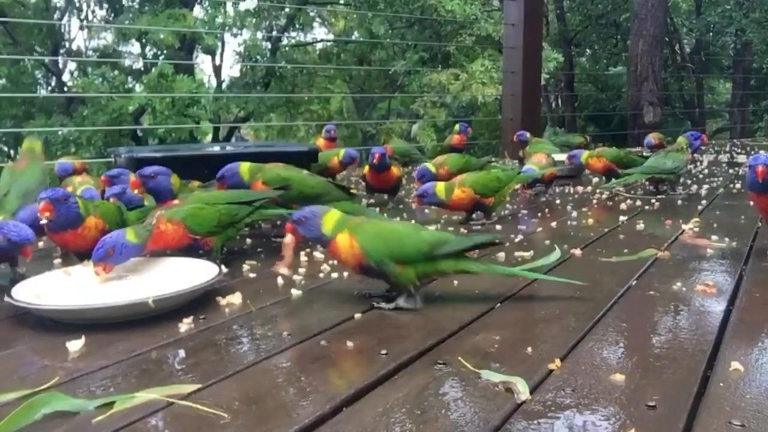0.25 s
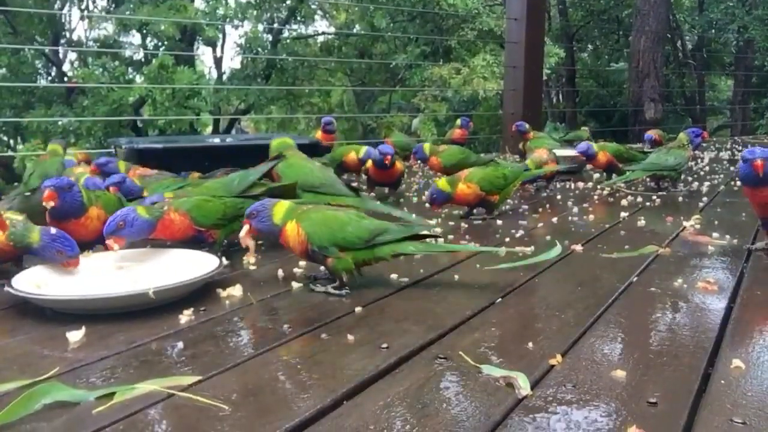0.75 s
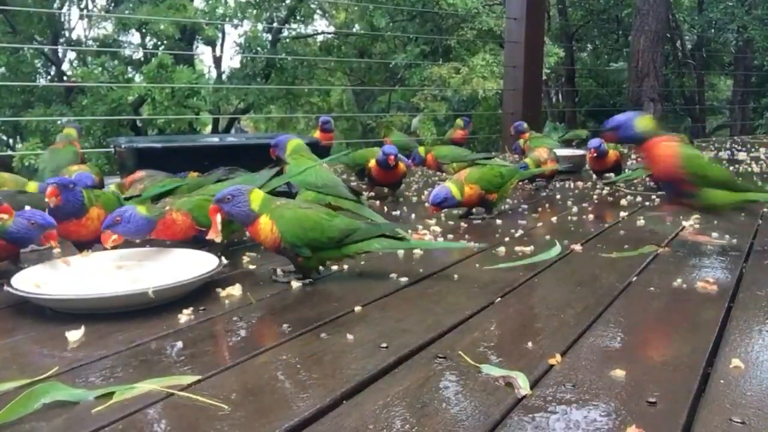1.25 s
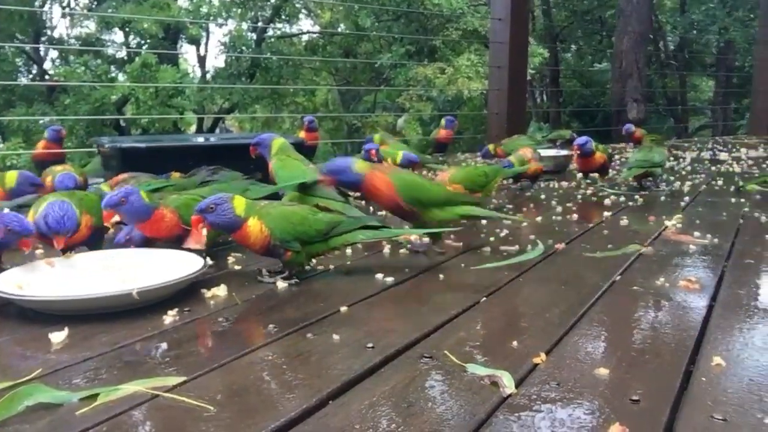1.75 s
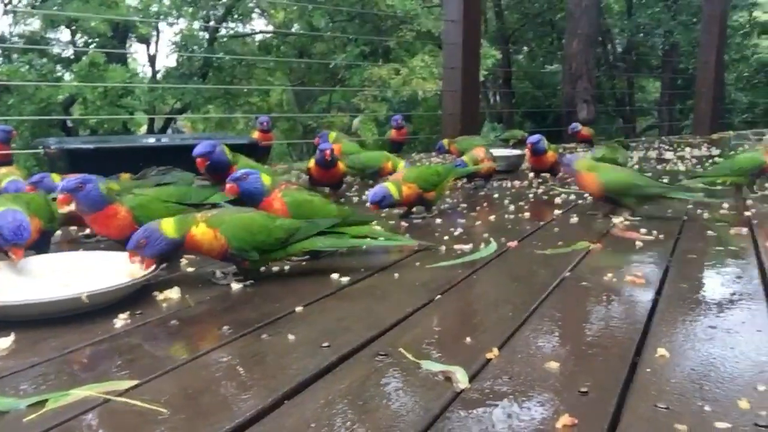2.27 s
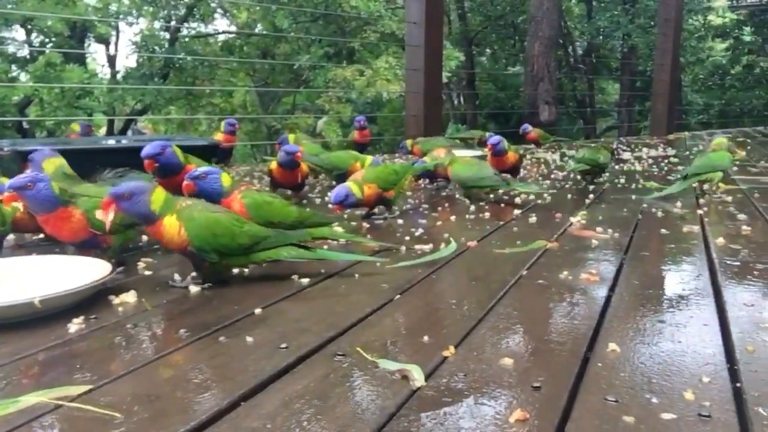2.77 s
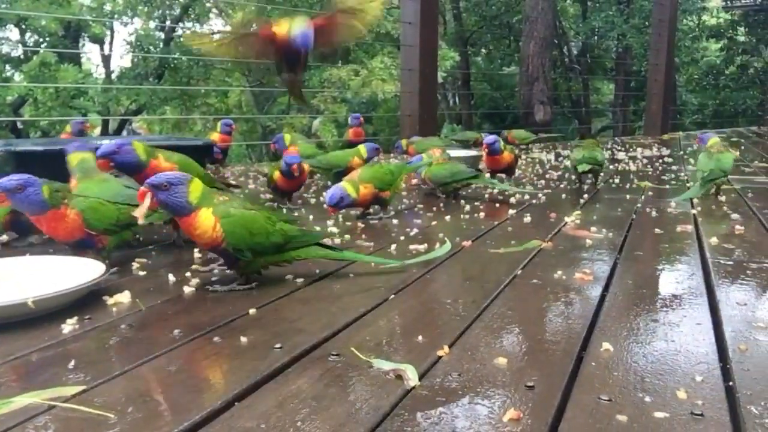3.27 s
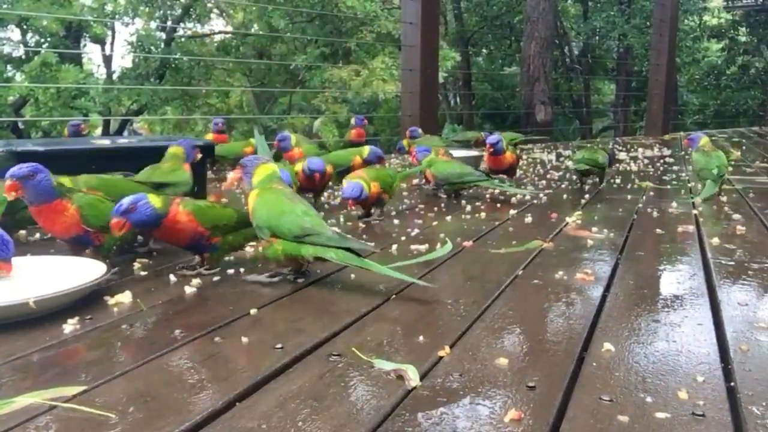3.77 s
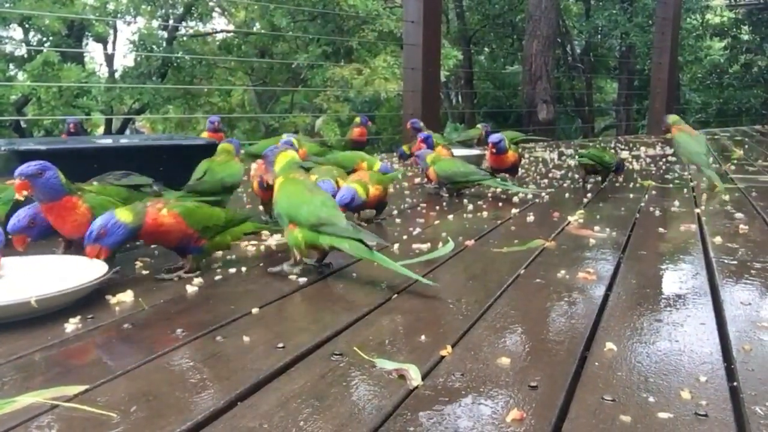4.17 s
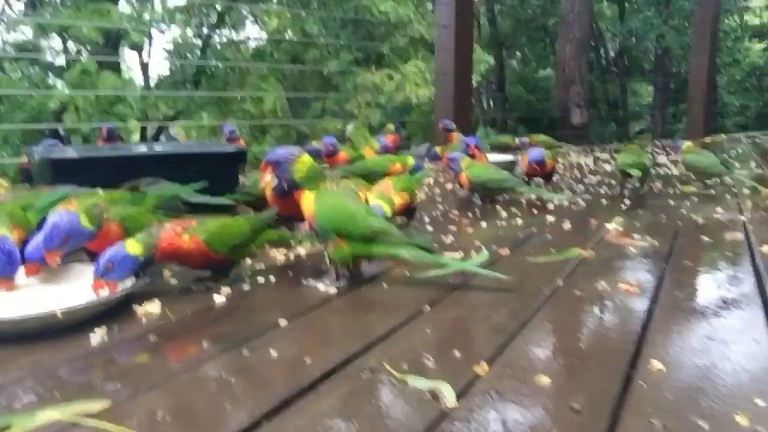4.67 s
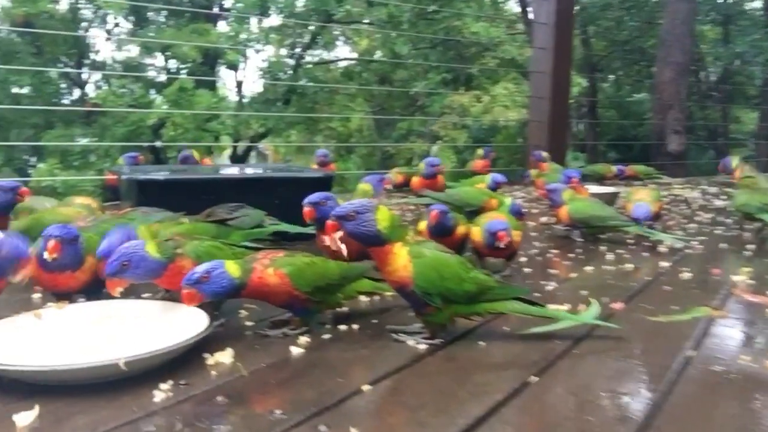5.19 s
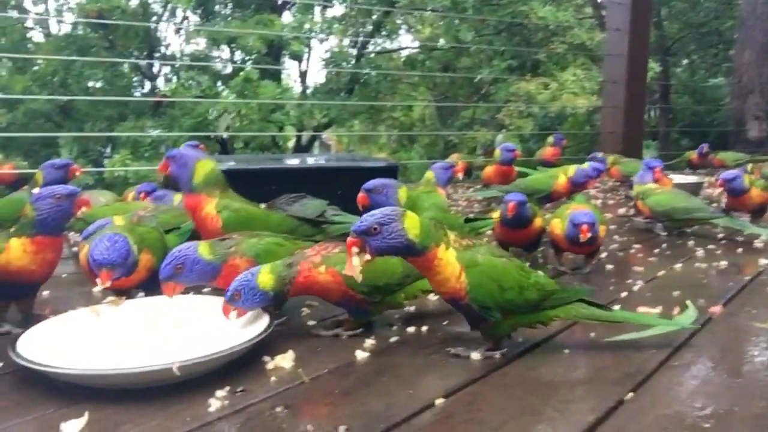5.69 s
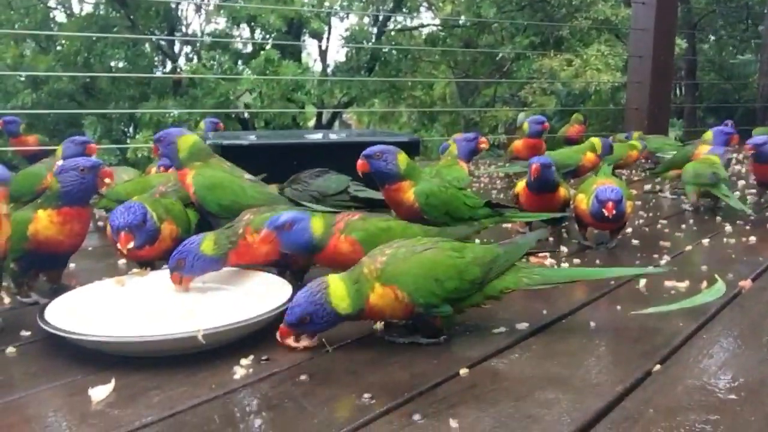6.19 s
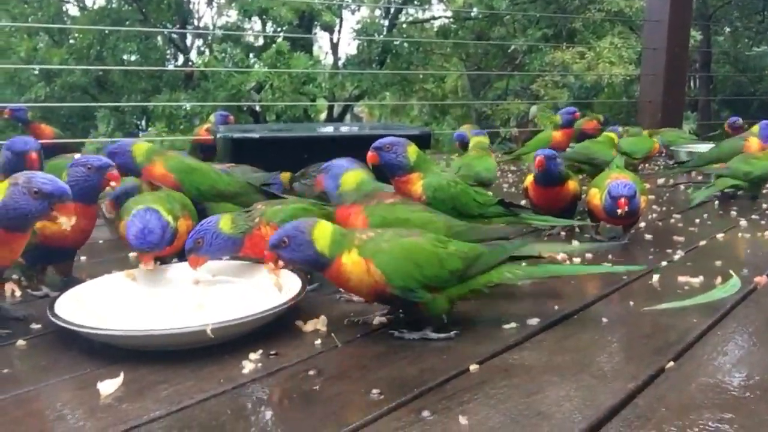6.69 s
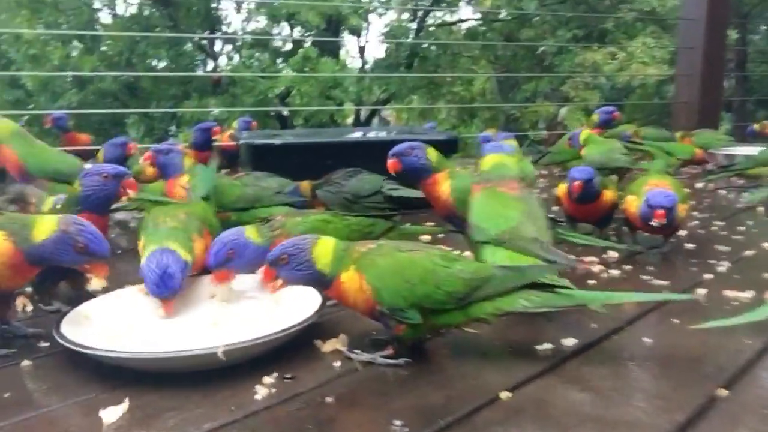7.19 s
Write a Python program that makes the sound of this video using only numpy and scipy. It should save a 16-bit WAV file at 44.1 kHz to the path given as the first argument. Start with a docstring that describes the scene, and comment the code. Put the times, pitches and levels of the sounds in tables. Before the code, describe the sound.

Short, high parrot whistles open the scene near the microphone, outdoors on a timber deck. Screeches overlap, loud whistles follow, and birds land with dull little thumps. Lower, rasping squawks come with a strong flap of wings, then the flock breaks into busier chatter with more fluttering. The calls carry a slight echo, while far-off chirps and a quiet rumble continue underneath.

```python
"""Small parrots feed on a wet timber deck beside a wood, over a low rumble and faint far-off chirps.
First come a few whistles and a soft trill, made by the birds' vibrating voice organs. A foot thumps a
board, wings beat the air, and screeches pile up at 2 s. Loud whistles follow at 3 s, then two thumps.
Near 4.5 s come low harsh calls, another thump and the strongest flutter. From 5 s on, calls crowd
together, with more wings and a last landing. All along, the deck roof and tree trunks echo the calls."""
import sys
import numpy as np
from scipy import signal
from scipy.fft import rfft, irfft, next_fast_len
from scipy.io import wavfile
from scipy.ndimage import uniform_filter1d, map_coordinates

SR = 44100
rng = np.random.default_rng(int(sys.argv[2]) if len(sys.argv) > 2 else 0)


def put_to_file(sound):
    """Save the sound as 16-bit audio at rate SR, in the file named by the first command-line argument."""
    columns = np.atleast_2d(sound).T  # one column per channel
    safe = np.clip(columns, -1, 1)
    whole_steps = np.round(safe * 32767)
    wavfile.write(sys.argv[1], SR, whole_steps.astype(np.int16))


N = 328104

# How well the beak lets overtones out: (frequency [Hz], gain [dB])
BEAK_GAIN = [(3000, 5.5), (5500, 5.5), (8000, -8.5), (12000, -13), (15500, -28)]
TOP_HZ = 15750
CLEAR, HUSKY, ROUGH, HARSH = .08, .2, .32, .47  # roughness of four kinds of voice, from 0 to 1


def call(rows, second_db, third_db, rough):
    """A bird's voice organ vibrates, making partials: tones at 1, 2, 3... times the pitch."""
    s, hz, db = np.transpose(rows)
    t = np.arange(s[0], s[-1], 1 / SR)
    size = len(t)
    level_db = np.interp(t, s, db)
    rough = rough + .15 * np.exp(-(t - s[0]) / .013)  # calls start hoarse
    # now and then the voice breaks: the pitch slips and the tone chokes
    breaks = np.clip(wobble(170, size) - 2.0 + 2.2 * rough, 0, 1)
    jitter = (.004 + .04 * rough) * wobble(200, size) + .12 * rough ** 2 * wobble(600, size)
    pitch = uniform_filter1d(np.interp(t, s, hz), size=200) * (1 + jitter - 0.139 * breaks)
    phase = 2 * np.pi * np.cumsum(pitch) / SR
    k = np.arange(1, 14)[:, None]  # partial numbers
    beak_db = along(BEAK_GAIN, k * pitch) - along(BEAK_GAIN, 3 * pitch)
    # rough voices and loud moments keep more treble
    upper_db = third_db + beak_db * (1.15 - 0.43 * rough) + 0.2 * (level_db - db.max())
    partial_db = np.where(k > 2, upper_db, np.where(k > 1, second_db, 0))
    # throat and beak keep moving: each partial swells on its own, the lowest least
    swells = np.array([wobble(90, size, order=1) for _ in k])
    partial_db += (1.5 + 5 * rough) * np.minimum(k, 2) / 2 * swells
    tone = (amp(partial_db) * (k * pitch < TOP_HZ) * np.sin(k * phase + k * k)).sum(0)
    hiss = uniform_filter1d(rng.standard_normal(size), size=3)
    breath = amp(third_db - 12.5) * (2 * rough) ** 2 * (1 + np.cos(phase)) * hiss  # one puff a cycle
    # in low voices, strong and weak cycles take turns in short bursts
    bursts = np.clip(wobble(40, size) - 1 + 3 * rough, 0, 1)
    growl = 1 + 1.2 * rough / (1 + (pitch / 2100) ** 8) * bursts * np.cos(phase / 2)
    rasp = 1 + (.05 + 1.2 * rough ** 2) * wobble(1300, size)
    voice = unit((tone + breath) * growl * rasp * amp(-8 * breaks))
    fade_in, fade_out = (t - s[0]) / .007, (s[-1] - t) / 0.0027
    fades = np.clip(np.minimum(fade_in, fade_out), 0, 1)
    return boards(amp(level_db) * fades * voice)


def glide(s, length, from_hz, to_hz, first_db, last_db):
    """A note slides fast, levels off and dies. Gives rows of (time [s], pitch [Hz], level [dB])."""
    progress = np.linspace(0, 1, num=12)
    hz = to_hz + (from_hz - to_hz) * (1 - progress) ** 1.4
    db = first_db + (last_db - first_db) * progress
    rows = np.transpose([s + progress * length, hz, db])
    release_s, release_db = 0.0045, -7
    return np.vstack([rows, rows[-1] + [release_s, 0, release_db]])


def throat(note):
    """A note's second partial, third partial and roughness; the beak sets the third from the second."""
    to_hz, second_db, rough = note[3], note[6], note[7]
    third_db = second_db + along(BEAK_GAIN, 3 * to_hz) - along(BEAK_GAIN, 2 * to_hz) - 3
    return second_db, third_db, rough


def flock():
    """Parrots whistle and screech on the deck. Gives the direct sound and the share that will echo."""
    # Calls that wind up and down: ((second partial [dB], third partial [dB], roughness [0-1]),
    # then a list of (time [s], pitch [Hz], level [dB]))
    warbles = [ ((-11, -21, CLEAR), [(.036, 1216, -25), (.053, 2150, -42), (.068, 2100, -36),
               (.076, 1300, -34), (.092, 2390, -34), (.098, 1850, -32)]), ((-22.5, -14, CLEAR),
               [(1.602, 1110, -24), (1.62, 2164, -38), (1.627, 1770, -30.5), (1.703, 1764, -36)]),
               ((-17.5, -24, ROUGH), [(5.76, 1984, -37), (5.768, 1523, -35), (5.783, 1727, -25),
               (5.8, 2550, -34)]), ((-5, -20, CLEAR), [(5.825, 2380, -42), (5.86, 2580, -42),
               (5.905, 2270, -33)]), ((-30, -42, CLEAR), [(5.912, 2100, -34), (5.922, 1590, -30),
               (5.939, 2050, -46)]), ((0, -10, HARSH), [(5.96, 1910, -43), (5.98, 1695, -51),
               (6.02, 1870, -33.5), (6.04, 2000, -51)]), ((-19, -35, HUSKY), [(6.058, 2165, -41),
               (6.072, 1855, -48), (6.11, 2560, -42), (6.14, 2140, -43), (6.16, 2500, -46),
               (6.185, 2200, -45)]), ((-2, -22, HUSKY), [(6.662, 1500, -52), (6.68, 2340, -59),
               (6.716, 1590, -44)]), ((-7.5, -19, ROUGH), [(7.15, 2550, -44), (7.178, 2160, -48),
               (7.195, 2500, -44), (7.222, 1970, -50), (7.25, 2265, -44), (7.266, 1830, -39.5),
               (7.278, 2180, -52), (7.305, 1430, -56)]), ((-8, -24, CLEAR), [(0.0, 2360, -27.5),
               (.045, 2815, -37), (.074, 3254, -21.5), (.114, 2770, -35), (.161, 3190, -27.5),
               (.185, 3090, -36)]), ((-7.5, -20.5, HUSKY), [(.097, 1860, -33.5), (.175, 2580, -30),
               (.2, 3030, -37), (.218, 2896, -25.5), (.24, 3106, -25.5), (.275, 2906, -34),
               (.29, 3260, -26), (.317, 2730, -26.5), (.333, 3330, -38)]), ((0.93, -6, ROUGH),
               [(.872, 1900, -48.5), (.904, 2710, -34.5), (.92, 2490, -34), (.96, 3050, -27.5),
               (.972, 3040, -71)]), ((-8, -11.5, HUSKY), [(4.283, 1084, -35.5), (4.32, 1463, -28.5),
               (4.36, 1576, -20), (4.378, 1440, -24.5)]), ((-8, -21.5, CLEAR), [(4.715, 2770, -42),
               (4.763, 3150, -32), (4.825, 3177, -29.5)]), ((-2.2, -13, CLEAR), [(5.798, 2580, -40),
               (5.822, 2530, -27), (5.848, 3170, -32.5), (5.865, 2940, -37.5), (5.89, 3088, -21),
               (5.92, 2570, -34)]), ((-9.5, -21.5, HUSKY), [(6.556, 1940, -47.5), (6.59, 2600, -37.5),
               (6.665, 2857, -20.5), (6.678, 2883, -14), (6.698, 2980, -34)]), ((-9.5, -24.5, HUSKY),
               [(6.73, 2570, -40.5), (6.765, 2870, -28), (6.788, 3076, -38.5), (6.84, 2930, -32.5),
               (6.87, 2730, -55)]), ]
    # Single sliding notes: (time [s], length [s], first pitch [Hz], last pitch [Hz],
    # first level [dB], last level [dB], second partial [dB], roughness [0-1])
    notes = [ (0.12, 0.015, 1030, 1340, -35, -50, -20, HUSKY),
             (0.172, 0.057, 2635, 2090, -34, -35.5, -21, CLEAR),
             (0.196, 0.0077, 1220, 1170, -47, -37.5, -18, HUSKY),
             (1.333, 0.033, 1964, 2175, -44, -42, -12, HUSKY),
             (1.366, 0.027, 2335, 2394, -42, -35, -17, ROUGH),
             (1.393, 0.032, 2310, 2984, -32, -38, -14.5, ROUGH),
             (1.554, 0.025, 1890, 1555, -41, -46, -8, CLEAR),
             (1.575, 0.012, 1880, 2040, -41, -35.5, -14, CLEAR),
             (1.89, 0.033, 1270, 1530, -52, -47.5, 3, ROUGH),
             (1.974, 0.032, 1786, 1604, -45, -40.5, 3, HUSKY),
             (2.005, 0.031, 3040, 3000, -38, -32, -18, HUSKY),
             (2.041, 0.015, 1448, 1557, -29, -31.5, 2, HUSKY),
             (2.046, 0.022, 3950, 4640, -45, -28, -15, HUSKY),
             (2.05, 0.021, 2970, 3360, -26, -24.5, -17, ROUGH),
             (2.067, 0.026, 2870, 3170, -27, -31.5, -7, HARSH),
             (2.068, 0.048, 3860, 4500, -36, -27.5, -22, HUSKY),
             (2.073, 0.079, 3470, 3630, -32, -40, -20, HARSH),
             (2.103, 0.047, 2955, 3274, -21, -29.5, -15, ROUGH),
             (2.126, 0.045, 3960, 4160, -26.5, -28, -22, CLEAR),
             (2.135, 0.059, 4420, 4580, -32, -33.5, -16.5, HUSKY),
             (2.16, 0.0576, 2903, 3163, -28.5, -27.5, -5.5, ROUGH),
             (2.178, 0.079, 3265, 3580, -35.5, -29.5, -7, ROUGH),
             (2.247, 0.039, 3396, 3086, -29.5, -31, -4, ROUGH),
             (2.964, 0.031, 2055, 1620, -40.5, -44, -11, ROUGH),
             (2.995, 0.031, 1633, 1720, -39, -39.5, -15.5, CLEAR),
             (3.033, 0.017, 2970, 3300, -39, -26, -23, HUSKY),
             (3.052, 0.018, 2600, 2525, -24.5, -32.5, 9, ROUGH),
             (3.067, 0.018, 2780, 2520, -24, -37, -2, ROUGH),
             (3.08, 0.019, 2870, 3130, -25, -18, -7, HUSKY),
             (3.098, 0.1, 2880, 3388, -22.5, -18.5, -9.5, CLEAR),
             (3.534, 0.26, 2990, 3270, -41, -51, -13, ROUGH),
             (3.568, 0.089, 3680, 3315, -48, -44.5, -6.5, HUSKY),
             (3.948, 0.2, 3470, 3740, -50.5, -56.5, -25, ROUGH),
             (4.372, 0.034, 1430, 1496, -22, -23, -2, HARSH),
             (4.474, 0.084, 1284, 1442, -36, -31.5, -3, ROUGH),
             (4.556, 0.03, 1398, 1195, -34, -29.5, -3.5, HARSH),
             (4.577, 0.023, 2066, 2030, -34, -33, -3, HUSKY),
             (4.909, 0.078, 2880, 3240, -34.5, -34, -11, CLEAR),
             (5.013, 0.045, 1680, 2195, -47.5, -40, -19, ROUGH),
             (5.045, 0.036, 3130, 3525, -42, -36, -33, HUSKY),
             (5.058, 0.023, 2280, 1970, -45, -36, -28, ROUGH),
             (5.078, 0.015, 1225, 1360, -37, -36, -7, HARSH),
             (5.096, 0.0174, 2510, 2810, -28, -34.5, -4, HUSKY),
             (5.113, 0.011, 2170, 2500, -32, -32.5, 0, ROUGH),
             (5.111, 0.063, 2210, 1780, -40, -50.5, -4.5, ROUGH),
             (5.133, .022, 2610, 2476, -36, -36.5, -13, HUSKY),
             (5.17, 0.037, 4440, 4566, -31.5, -26, -17.5, CLEAR),
             (5.21, 0.075, 3063, 3497, -26.5, -20.5, -6.5, CLEAR),
             (5.283, 0.029, 2880, 2740, -27, -30.5, -5.5, CLEAR),
             (5.215, 0.084, 2994, 3063, -41, -33, 1, CLEAR),
             (5.475, 0.11, 2967, 2747, -44, -48, -10, ROUGH),
             (6.096, 0.017, 1230, 1307, -36.5, -29, -4, HARSH),
             (6.118, 0.038, 1317, 1514, -32.5, -29, -4.5, ROUGH),
             (6.157, .032, 1447, 1481, -27, -19.5, 1, HUSKY),
             (6.19, 0.016, 1435, 1403, -15, -24.5, 2, HARSH),
             (6.747, 0.13, 1357, 1479, -41.5, -44.5, 8.5, HUSKY),
             (7.031, 0.027, 1760, 1740, -42.5, -32, -10, CLEAR),
             (7.056, 0.016, 2000, 2160, -38, -43, -17, HUSKY),
             (7.074, 0.015, 3130, 3370, -27.5, -24.5, -25, CLEAR),
             (7.085, 0.027, 2560, 2485, -34.5, -29, 7, ROUGH),
             (7.108, 0.035, 2604, 2995, -33.5, -21, 2, ROUGH),
             (7.142, 0.016, 2880, 3120, -25, -30.5, 3.5, ROUGH),
             (7.158, 0.071, 3146, 3285, -20, -22.5, -11.5, CLEAR), ]
    direct, to_echo = np.zeros(N), np.zeros(N)
    for voice, rows in warbles + [(throat(note), glide(*note[:6])) for note in notes]:
        sound = call(rows, *voice)
        start, loudest_db = rows[0][0], np.max(rows, 0)[2]
        add(direct, start, sound)
        # a faint call comes from farther off and carries more echo
        echo_db = min(-17 - 0.6 * (loudest_db + 25), 0)
        add(to_echo, start, sound * amp(echo_db))
    return direct, to_echo


def trills():
    """A parrot sings four quick notes, each a little lower; each holds its pitch, then drops."""
    # Soft trills: (time [s], note spacing [s], first pitch [Hz], level [dB])
    runs = [(1.184, 0.035, 2196, -43.5), (2.521, 0.039, 2390, -50.5), (5.605, 0.041, 2210, -54)]
    sag, drop, drop_s = 0.98, 0.64, 0.00786
    out = np.zeros(N)
    for start, gap, first_hz, db in runs:
        for k in range(4):
            s, end = start + k * gap, start + (k + 0.97) * gap
            hz = first_hz * sag ** k
            rows = [(s, hz, db), (end - drop_s, hz, db), (end, drop * hz, db)]
            add(out, s, call(rows, -12.0, -19.0, CLEAR) * amp(rng.normal(0, 1.8)))
    return out


def wings():
    """Feathers beat the air in uneven puffs, about thirteen a second."""
    # How each flutter swells and fades: one list of (time [s], relative level [dB]) per flutter
    flutters = [
        [(1.6, -57.5), (1.95, -51), (2.6, -54), (3.5, -58)],
        [(4.35, -60), (4.55, -39), (4.87, -41.5), (4.9, -62)],
        [(5.93, -81), (5.97, -47), (6.1, -51.5)],
        [(6.47, -61), (6.54, -45), (6.62, -58.5), (6.9, -47), (7.2, -44), (7.44, -60)],
    ]
    # Tone of air pushed by feathers: (frequency [Hz], relative level [dB])
    feathers = [(30, -9), (70, 10.5), (160, -6), (550, 3), (1100, -10.5), (1400, -23.5), (4000, -25),
                (8000, -91)]
    level = np.zeros(N)
    for rows in flutters:
        s, db = np.transpose(rows)
        level += amp(np.interp(np.arange(N) / SR, s, db, -120, -120))
    beat_hz = 13 + 2 * wobble(2.2, N)
    beat = np.cos(2 * np.pi * np.cumsum(beat_hz) / SR)
    puffs = unit(amp(1.6 * beat + 1.06 * wobble(45, N)) * rush(feathers, patchy_db=3.5))
    return amp(3.0) * uniform_filter1d(level, size=900) * puffs


def feet():
    """A landing pushes a board once; claws add a short scratch."""
    # Landings: (time [s], relative level [dB], board pitch [Hz])
    landings = [(1.394, -21, 99.5), (3.54, -18.5, 110), (3.742, -14, 158), (4.58, -14, 76.5),
                (6.934, -16, 62.5)]
    out, t = np.zeros(N), np.arange(SR // 8) / SR
    onset = 1 - np.exp(-t / 0.0092)
    for s, db, hz in landings:
        push = np.sin(2 * np.pi * hz * t) * amp(-60 * t / 0.068)
        dull_noise = uniform_filter1d(uniform_filter1d(rng.standard_normal(len(t)), size=24), size=30)
        claws = 4 * dull_noise * amp(-60 * t / 0.078)
        add(out, s, amp(db - 10.5) * (push + claws) * onset)
    return out


def far_birds(count=55):
    """Birds farther along the deck and in the trees give faint, short chirps."""
    out = np.zeros(N)
    for when, height, slide, length, loudness in rng.random((count, 5)):
        s, hz, db = when * N / SR, 1800 + 1700 * height, -66 + 8 * loudness
        end, end_hz = s + 0.027 + 0.076 * length, hz * (0.83 + 0.29 * slide)
        add(out, s, call([(s, hz, db), (end, end_hz, db)], second_db=0.5, third_db=-12.0, rough=0.357))
    return out


def boards(x, count=5):
    """Wet boards, rails and wall bounce back quick copies of a call, different for every perch."""
    bounces = np.zeros(SR // 70)
    delay, flip = rng.random((count, 2)).T
    bounces[(delay * (len(bounces) - 1)).astype(int)] = amp(-14 - 8 * delay) * np.sign(flip - .5)
    bounces[0] = 1  # the call itself
    return signal.fftconvolve(x, bounces)


def echoes(x):
    """Roof, posts and trunks send the sound back; high tones linger longest."""
    # How long the echo lasts: (frequency [Hz], time to fade by 60 dB [s])
    fade_times = [(1000, 0.042), (3000, 0.46), (7000, 0.59), (14000, 0.71)]
    hz, t, noise = signal.stft(rng.standard_normal(SR), SR, nperseg=256)
    tail = signal.istft(noise * amp(-60 * t / along(fade_times, hz)[:, None]), SR, nperseg=256)[1]
    delayed = np.pad(x, (400, 0))
    return signal.fftconvolve(delayed, tail / np.linalg.norm(tail))[:N]


def air(level_db=-48.5):
    """A distant rumble and the hiss of wet leaves swell and sink a little."""
    # Tone of the rumble and hiss: (frequency [Hz], relative level [dB])
    outdoors = [(20, -62), (35, -2.5), (55, -8), (155, -4), (307, -12.5), (600, -20), (1000, -25.5),
                (2500, -21), (6000, -36.5), (15600, -47)]
    swell_db = 1.2 * wobble(1.5, N)
    return amp(level_db + swell_db) * rush(outdoors, patchy_db=4.0)


def rush(spectrum, patchy_db):
    """Rushing noise with the given tone and random louder and softer patches."""
    noise = signal.stft(rng.standard_normal(N + 512), nperseg=512)[2]
    patches = uniform_filter1d(uniform_filter1d(rng.standard_normal(noise.shape), 5, 0), 6, 1)
    depth = 1 / (1 + np.arange(len(noise))[:, None] / 40)  # the treble is steadier
    patchy = signal.istft(noise * amp(patchy_db * unit(patches) * depth), nperseg=512)[1][:N]
    return unit(filtered(patchy, lambda hz: amp(along(spectrum, hz))))


def amp(db):
    """Turns decibels into a number to multiply by."""
    return 10 ** (np.asarray(db) / 20)


def unit(x):
    """Scales a sound to an average strength (rms) of 1."""
    return x / np.sqrt(np.mean(x ** 2) + 1e-20)


def along(points, hz):
    """Reads between the rows of a (frequency [Hz], value) table, spaced by octaves."""
    freqs, values = np.transpose(points)
    return np.interp(np.log(hz + 1), np.log(freqs + 1), values)


def wobble(rate, size, order=3):
    """A smooth curve through `rate` random points a second."""
    points = rng.standard_normal(int(size * rate / SR) + 4)
    return map_coordinates(points, [np.arange(size) * rate / SR], order=order)


def filtered(x, response):
    """Turns each frequency up or down by response(hz)."""
    size = next_fast_len(N + SR // 2)
    return irfft(rfft(x, size) * response(np.fft.rfftfreq(size, 1 / SR)), size)[:N]


def add(track, s, sound):
    """Mixes a sound into the track, starting at s seconds."""
    part = track[round(s * SR):][:len(sound)]
    part += sound[:len(part)]


def scene():
    """Birds, echoes, wings, feet and outdoor air, mixed into one channel."""
    near, to_echo = flock()
    near += trills()
    far = far_birds()
    birds = near + far / 4 + echoes(to_echo + far)
    # so small a throat sends out nothing low
    birds = filtered(birds, lambda hz: 1 / (1 + (1000 / (hz + 1)) ** 8))
    return (birds + wings() + feet() + air())[None]


def record(dry):
    """Cuts away the treble above TOP_HZ."""
    return filtered(dry[0], lambda hz: hz < TOP_HZ)[None]


dry = scene()
out = record(dry)
put_to_file(out)
```